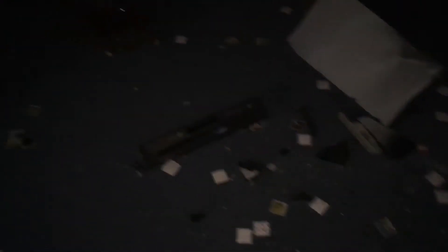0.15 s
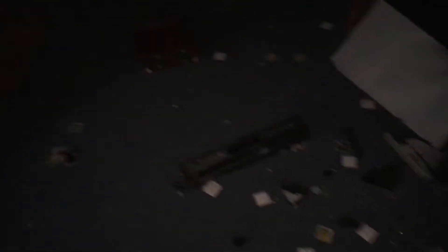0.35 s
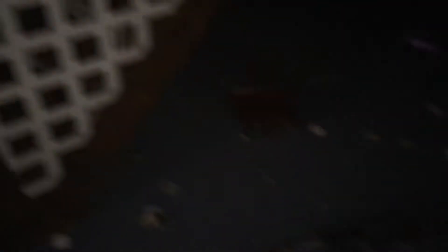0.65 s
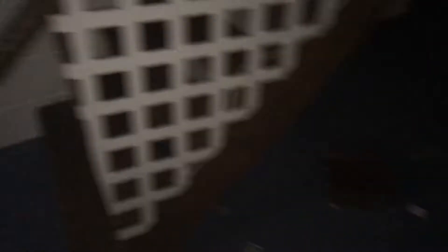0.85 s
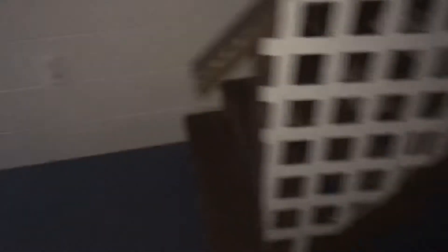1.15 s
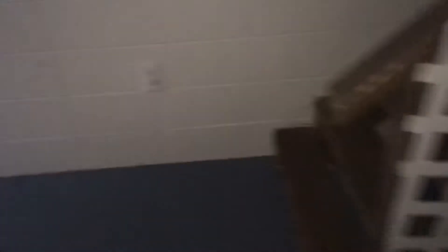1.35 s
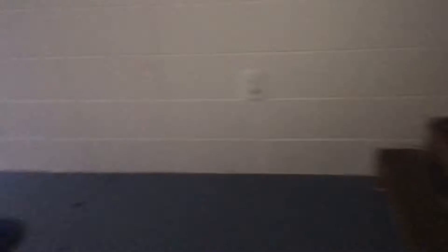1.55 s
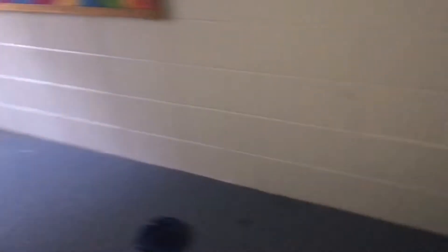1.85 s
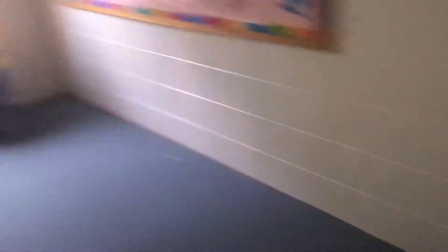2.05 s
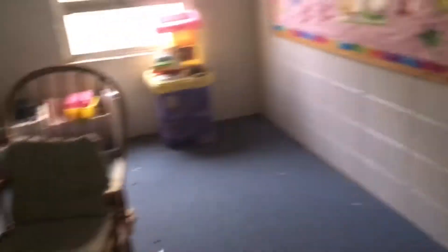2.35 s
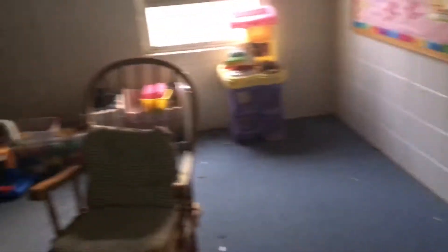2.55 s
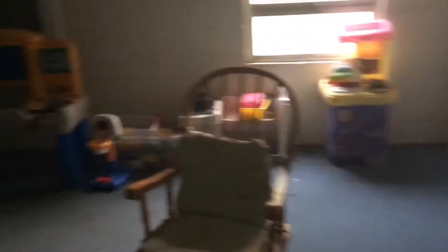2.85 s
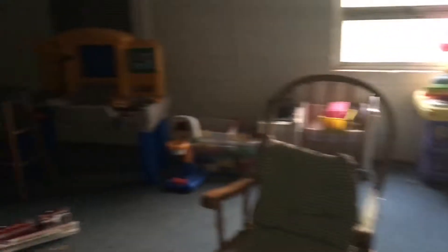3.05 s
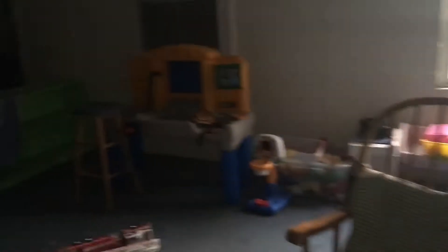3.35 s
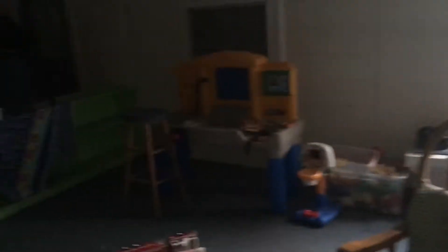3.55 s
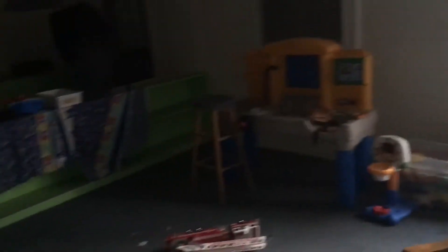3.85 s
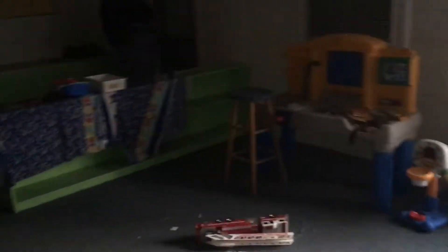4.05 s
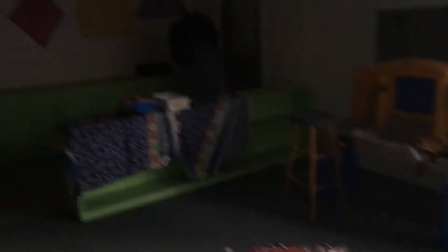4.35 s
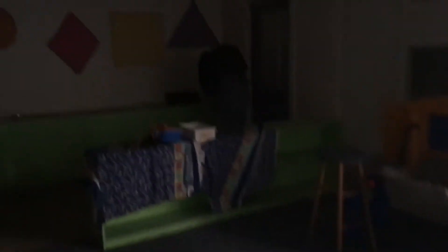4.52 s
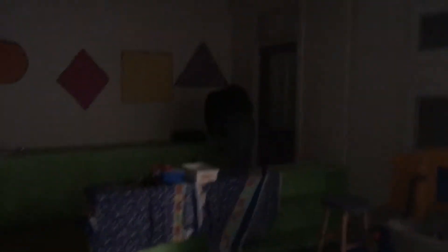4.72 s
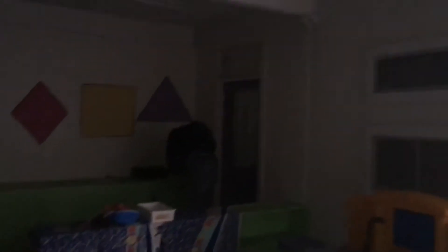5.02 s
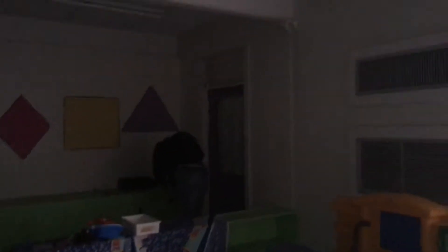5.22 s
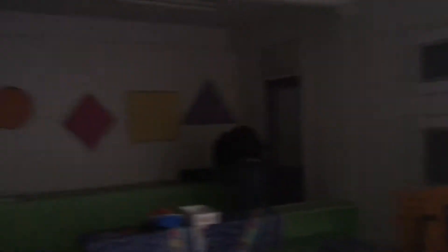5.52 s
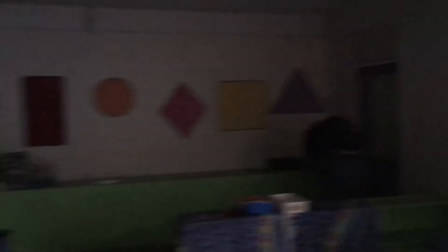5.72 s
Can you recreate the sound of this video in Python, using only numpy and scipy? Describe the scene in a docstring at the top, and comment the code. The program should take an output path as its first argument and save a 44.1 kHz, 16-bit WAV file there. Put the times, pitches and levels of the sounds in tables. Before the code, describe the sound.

Someone moves softly around a quiet basement, bumping hollow and plastic things, until something heavy bangs close by and the room booms.

```python
"""Two hollow knocks, the second with a sharp snap, sound in a quiet basement playroom with block walls.
Someone is moving about and bumping into things: soft footfalls and scuffs on the carpet, two plastic
clacks, a nudged toy. Then something heavy bangs and rattles close by and the room booms.
Hard contacts are bursts of tiny slips, coloured by the thing struck; thumps are swells of low noise;
the boom is the ringing of the floor's and room's low modes. Rumble and faint hiss lie underneath."""
import sys
import numpy as np
from scipy import signal
from scipy.fft import rfft, irfft
from scipy.io import wavfile

SR = 44100
rng = np.random.default_rng(int(sys.argv[2]) if len(sys.argv) > 2 else 0)


def bounce(signal):
    """Save signal as a 16-bit WAV file at the path given by the first command-line argument."""
    frames = np.transpose(np.atleast_2d(signal))
    limited = np.clip(frames, -1, 1)
    pcm = np.round(limited * 32767).astype(np.int16)
    wavfile.write(sys.argv[1], SR, pcm)


N = 259308
TIME = np.arange(N) / SR

# The heavy thing lands, one edge after another. Each row: time in seconds, level in dB.
HEAVY_HITS = [(5.357, -34), (5.364, -32), (5.382, -30.5), (5.405, -33.5)]
# Blows that set the floor and room booming. Each row: start in seconds, level in dB.
BOOM_HITS = [(5.346, -26.5)]
# The boom's low modes. Each row: pitch in Hz, gain in dB, seconds to fall 60 dB.
LOW_MODES = [(48.9, 7, 0.47), (67.1, -13, 0.68), (115.4, -3.5, 0.33), (140.5, -29, .5), (174, -17, 0.75),
             (209.7, -15.5, 0.69), (272, -5.5, 0.354), (352, -22, 0.52)]
# Close, sharp snaps. Each row: time in seconds, level in dB, seconds for the stutter to fall 60 dB.
SNAP_HITS = [(0.42, -51, .014), (0.6074, -32.5, 0.11), (0.678, -51, 0.007), (5.3266, -38.5, 0.032),
             (5.3406, -31.5, 0.066), (5.384, -26.5, 0.016)]
# Bumps on something hollow, on hard plastic and on a small toy. Each row: time in seconds, level in dB.
HOLLOW_HITS = [(.254, -45.5), (.271, -37.5), (.435, -55), (.603, -44), (.610, -40), (.684, -58)]
PLASTIC_HITS = [(2.980, -37.5), (2.986, -39), (3.001, -41), (3.017, -39)]
TOY_HITS = [(3.639, -47.5)]
# Dull thumps and footfalls. Each row: time in seconds, level in dB, centre pitch in Hz.
THUMP_HITS = [(0.304, -46.5, 103), (.358, -48.5, 59), (.423, -63, 62), (0.804, -60.5, 81),
              (1.726, -55.5, 158), (2.737, -54, 168), (2.927, -47.5, 350), (2.951, -50.5, 220),
              (3.395, -56, 200), (3.419, -55, 121), (3.465, -53, 73), (3.576, -59.5, 56), (5.429, -37, 110)]
# Tiny ticks. Each row: time in seconds, level in dB, pitch in Hz.
TICK_HITS = [(1.037, -54.5, 2150), (2.049, -56, 1800), (2.461, -49, 15200), (3.469, -55, 4400),
             (4.391, -55.5, 1920), (4.785, -47, 1350)]
# Scuffs of shoes and clothing. Each row: peak time in seconds, level in dB, rise in seconds.
SCUFF_STROKES = [(.137, -71.5, 0.0065), (0.243, -59, 0.013), (.812, -64.5, 0.041), (1.12, -66.5, 0.033),
                 (1.559, -68.5, 0.035), (2.206, -61.5, 0.023), (2.34, -68.5, 0.026), (2.76, -69, 0.032),
                 (3.38, -67, 0.03), (4.195, -66, 0.048), (4.454, -62, 0.0028)]
# The fader curve of the rustle. Each row: time in seconds, level in dB.
RUSTLE_LEVELS = [(0, -68), (.9, -70.5), (1.35, -63.5), (1.58, -62.5), (1.8, -71), (2.2, -65), (2.6, -77),
                 (3.3, -63), (3.7, -72), (4.3, -79.5), (5.88, -74)]

# Tone colours of the things struck or rubbed. Each row: frequency in Hz, relative gain in dB.
HEAVY_TONE = [(100, -12), (330, 5), (500, 1.5), (640, -2), (1150, -0.5), (1400, -2.5), (2700, 1.5),
              (4000, -3.5), (4900, -9), (6100, -3.5), (7500, -10), (10000, -10.5), (11500, -10),
              (16000, -17)]
SNAP_TONE = [(300, -12), (2500, 3.5), (5500, -5.5), (8000, -4), (13000, 8), (16000, 5)]
HOLLOW_TONE = [(80, -14), (220, -13.5), (530, -7), (720, -4), (900, 0), (1220, -4.5), (1500, -9.5),
               (2150, -14), (2600, -23.5), (3900, -27.5), (5000, -38), (16000, -61)]
PLASTIC_TONE = [(100, -17), (400, -5.5), (800, -8), (1040, 2), (1250, -7.5), (2100, -7), (2600, -5),
                (3450, -2.5), (4800, -16), (7600, -20), (9300, -16), (16000, -23)]
TOY_TONE = [(200, -18), (700, -4), (1000, -9.5), (1500, -3.5), (2450, -3), (4500, -13.5), (7000, -11.5),
            (10000, -20), (16000, -17)]
SCUFF_TONE = [(150, -8), (1000, 2), (3500, 1), (5000, -2.5), (6500, 0), (10000, -5), (16000, -17)]
RUSTLE_TONE = [(40, -6.5), (150, -0.5), (350, 1), (600, -9), (1100, -9), (2500, -13.5), (6000, -22),
               (16000, -19)]
# The still room and the microphone's hiss. Each row: frequency in Hz, relative gain in dB.
ROOM_TONE = [(15, -30.5), (30, -14.5), (47, 7.5), (70, 0.5), (170, -6), (300, -14), (600, -18),
             (1300, -20.5), (2000, -23.5), (3600, -24), (4950, -30.5), (6100, -24), (7700, -28.5),
             (10500, -27), (12500, -22), (16000, -25.5)]
# The reverb of the walls. Each row: frequency in Hz, seconds to fall 60 dB.
REVERB_TIMES = [(50, 1), (200, 0.58), (500, 0.39), (2500, 0.51), (6000, 0.42), (11000, 0.31), (16000, 0.35)]


def heavy_bangs():
    """The heavy thing bangs and rattles; its body shudders and a deep rumble lingers."""
    hits = bumps(HEAVY_HITS, rise_s=0.0021, fall_s=0.04, chatter_db=-11.5, lead_s=0.022, settle_s=0.29)
    body = shake(HEAVY_HITS, gain_db=-10, hz=145, octaves=0.74, rise_s=0.015, fall_s=0.28)
    rumble = shake(HEAVY_HITS, gain_db=-23.5, hz=46, octaves=0.4, rise_s=0.03, fall_s=3.2)
    rattle = colour(contacts(hits, grain_db=7.5), HEAVY_TONE)
    return room(rattle + body, wet_db=-6) + rumble


def room_boom(build_cycles=3.95):
    """Each low mode takes a few cycles to build up, so the deepest blooms last."""
    out, t = np.zeros(N), TIME[:SR]
    ring = np.zeros(SR)
    for hz, db, t60 in LOW_MODES:
        build = 1 - np.exp(-(hz * t / build_cycles) ** 2)
        ring += amp(db - 60 * t / t60) * build * np.sin(2 * np.pi * hz * t)
    for start, db in BOOM_HITS:
        add(out, start, amp(db) * np.sqrt(2) * ring)
    return out


def snaps(catches=5, first_gap_s=0.0017, gap_growth=1.8, rise_s=0.0003, click_s=0.01, fizz_db=-20):
    """A bright, nearly dry snap catches again and again: clicks that slow as they die, over a fizz."""
    gaps = first_gap_s * gap_growth ** np.arange(catches - 1)
    delays = np.append(0, np.cumsum(gaps))
    clicks = [(at + delay, db - 60 * delay / fall, rise_s, click_s)
              for at, db, fall in SNAP_HITS for delay in delays]
    fizz = [(at, db + fizz_db, rise_s, 2 * fall) for at, db, fall in SNAP_HITS]
    return room(colour(contacts(clicks + fizz, grain_db=-3), SNAP_TONE), wet_db=-25.5)


def hollow_knocks():
    """A hollow thing scrapes, knocks and drones briefly."""
    hits = bumps(HOLLOW_HITS, rise_s=0.0031, fall_s=0.024, chatter_db=-6, lead_s=0.018, settle_s=0.13)
    body = shake(HOLLOW_HITS, gain_db=-12, hz=211, octaves=0.38, rise_s=0.021, fall_s=0.23)
    knock = colour(contacts(hits, grain_db=1), HOLLOW_TONE)
    return room(knock + body, wet_db=-5.5)


def plastic_clacks():
    """Hard plastic strikes abruptly and rebounds."""
    hits = bumps(PLASTIC_HITS, rise_s=0.00074, fall_s=0.033,
                 chatter_db=-12.5, lead_s=0.016, settle_s=0.32)
    body = shake(PLASTIC_HITS, gain_db=-16.5, hz=168, octaves=0.43, rise_s=0.0054, fall_s=0.076)
    clack = colour(contacts(hits, grain_db=5.5), PLASTIC_TONE)
    return room(clack + body, wet_db=-10)


def toy_nudge():
    """A light toy shifts and settles."""
    hits = bumps(TOY_HITS, rise_s=0.0038, fall_s=0.03, chatter_db=-5.5, lead_s=0.008, settle_s=0.17)
    return room(colour(contacts(hits, grain_db=7), TOY_TONE), wet_db=-5.5)


def thumps(rise_cycles=1.23, fall_cycles=20):
    """Footfalls and soft blows shake only the low end; the deeper, the slower they come and go."""
    rows = [(at, db, rise_cycles / hz, fall_cycles / hz, hz) for at, db, hz in THUMP_HITS]
    return room(pitched_bursts(rows, octaves=0.49), wet_db=-8.5)


def ticks(rise_s=0.00028, fall_s=0.0065):
    """Small parts click with a very short ring."""
    rows = [(at, db, rise_s, fall_s, hz) for at, db, hz in TICK_HITS]
    return room(pitched_bursts(rows, octaves=0.21), wet_db=-5)


def scuffs_and_rustle(fall_s=0.18, flutter_db=2.5, flutter_s=0.04):
    """Shoes and clothing scuff over a soft rustle that flutters as cloth catches and slides."""
    strokes = [(at, db, rise, fall_s) for at, db, rise in SCUFF_STROKES]
    scuffs = colour(contacts(strokes, grain_db=2), SCUFF_TONE)
    knots = np.arange(0, N / SR + flutter_s, flutter_s)
    flutter = flutter_db * np.interp(TIME, knots, rng.standard_normal(len(knots)))
    fader_db = np.interp(TIME, *np.transpose(RUSTLE_LEVELS))
    rustle = amp(fader_db + flutter) * colour(rng.standard_normal(N), RUSTLE_TONE)
    return room(scuffs, wet_db=-8) + rustle


def still_room(level_db=-64.5):
    """A steady bed of low rumble and faint hiss."""
    return amp(level_db) * colour(rng.standard_normal(N), ROOM_TONE, size=16384)


def room(direct, wet_db, size=256, onset_s=0.015):
    """Direct sound plus dense wall reflections; the bass hangs on longest."""
    reflections = rng.standard_normal(SR) * (rng.random(SR) < 0.1)
    hz, t, spectra = signal.stft(reflections, SR, nperseg=size)
    decay = amp(-60 * t / read(REVERB_TIMES, hz)[:, None])
    tail = signal.istft(spectra * decay, SR, nperseg=size)[1][:SR]
    tail *= 1 - np.exp(-(TIME[:SR] / onset_s) ** 2)  # the first reflections take time to arrive
    return direct + amp(wet_db) * signal.oaconvolve(direct, tail / np.linalg.norm(tail))[:N]


def bumps(hits, rise_s, fall_s, chatter_db, lead_s, settle_s):
    """Each hit is one hard contact inside a weaker chatter: the thing slides in, strikes and settles."""
    strikes = [(at, db, rise_s, fall_s) for at, db in hits]
    chatter = [(at, db + chatter_db, lead_s, settle_s) for at, db in hits]
    return strikes + chatter


def contacts(rows, grain_db):
    """Each contact is a burst of tiny slips of uneven size."""
    power = np.zeros(N)
    t = np.arange(SR // 2) / SR - 0.1
    for at, db, rise, fall in rows:
        add(power, at + t[0], (amp(db) * swell(t, rise, fall)) ** 2)
    slips = rng.choice([-1., 1.], N) * amp(grain_db * np.clip(rng.standard_normal(N), -2, 2))
    return np.sqrt(power) * unit(slips)


def shake(hits, gain_db, hz, octaves, rise_s, fall_s):
    """Every hit also shakes the body behind it, in proportion to its strength."""
    return pitched_bursts([(at, db + gain_db, rise_s, fall_s, hz) for at, db in hits], octaves)


def pitched_bursts(rows, octaves):
    """One swell of pitched noise for each row."""
    out, t = np.zeros(N), np.arange(SR) / SR - 0.15
    for at, db, rise, fall, hz in rows:
        add(out, at + t[0], amp(db) * swell(t, rise, fall) * band(hz, octaves, size=len(t)))
    return out


def swell(t, rise_s, fall_s):
    """Force builds up to t = 0, then dies away by 60 dB in fall_s."""
    return np.where(t < 0, np.exp(-(t / rise_s) ** 2), amp(-60 * np.maximum(t, 0) / fall_s))


def band(hz, octaves, size):
    """Noise around one pitch, compressed to a more even envelope."""
    freqs = np.fft.rfftfreq(size, 1 / SR) + 1
    bell = np.exp(-0.5 * (np.log2(freqs / hz) / octaves) ** 2)
    noise = signal.hilbert(irfft(rfft(rng.standard_normal(size)) * bell, size))
    power = abs(noise) ** 2
    return unit(noise.real / np.sqrt(power + np.mean(power) / 2))


def colour(x, tone, size=4096):
    """Rings a sound through a minimum-phase EQ of unit energy."""
    log_gain = np.log(amp(read(tone, abs(np.fft.fftfreq(size, 1 / SR)))))
    response = np.exp(np.conj(signal.hilbert(log_gain)))
    ring = np.fft.ifft(response).real[:size // 2]
    return signal.oaconvolve(x, ring / np.linalg.norm(ring))[:N]


def read(points, hz):
    """Reads a table on a log-frequency axis."""
    freqs, values = np.transpose(points)
    return np.interp(np.log(hz + 1), np.log(freqs + 1), values)


def add(mix, start_s, sound):
    """Mixes a sound in at start_s."""
    part = mix[max(round(start_s * SR), 0):][:len(sound)]
    part += sound[:len(part)]


def amp(db):
    """Turns dB into gain."""
    return 10 ** (np.asarray(db) / 20)


def unit(x):
    """Scales to an rms of one."""
    return x / np.sqrt(np.mean(x ** 2) + 1e-20)


def scene():
    """The mono mix: bumped things over footfalls, rustle and room tone."""
    bumped = hollow_knocks() + plastic_clacks() + toy_nudge() + heavy_bangs()
    return (bumped + snaps() + thumps() + room_boom() + ticks() + scuffs_and_rustle() + still_room())[None]


def record(dry, cutoff_hz=15950):
    """A steep low-pass trims the very top."""
    low_pass = signal.firwin(511, cutoff_hz, window=("kaiser", 9), fs=SR)
    return signal.oaconvolve(dry, low_pass[None], "same")


dry = scene()
out = record(dry)
bounce(out)
```